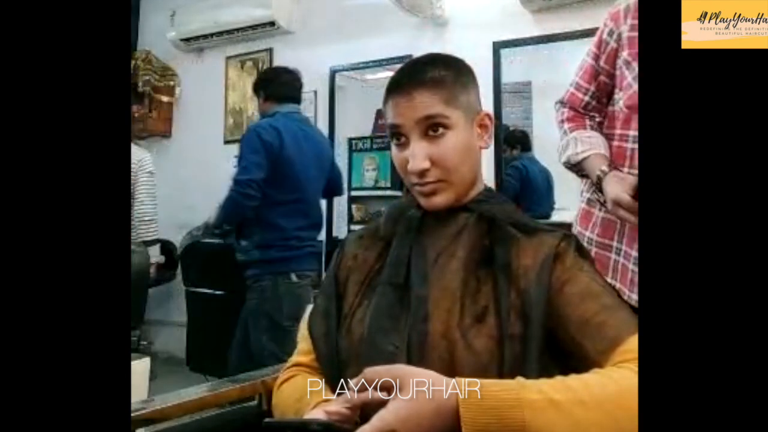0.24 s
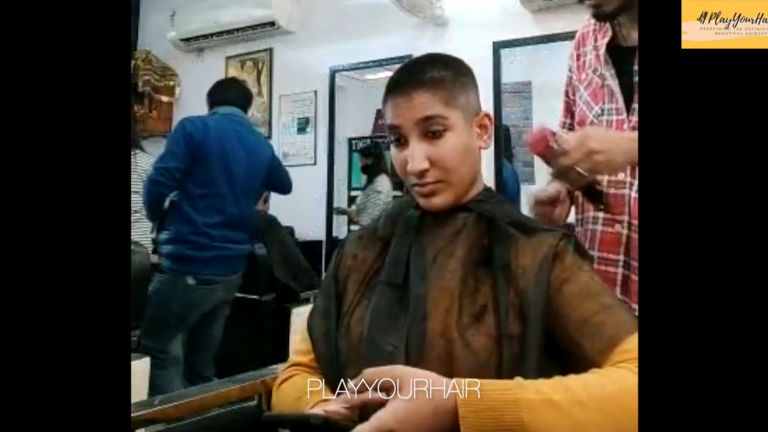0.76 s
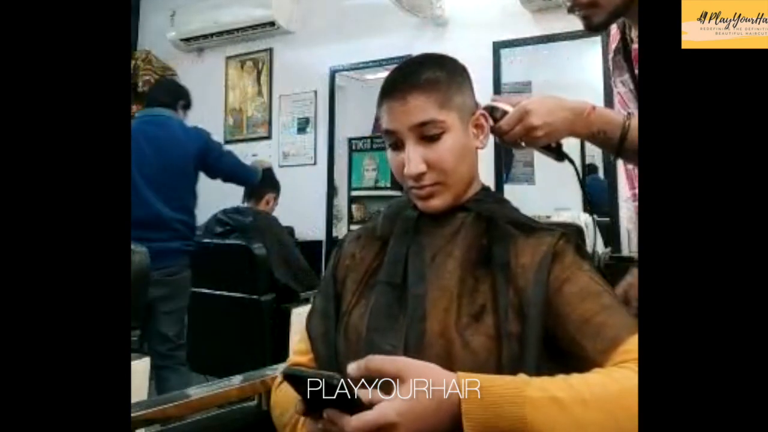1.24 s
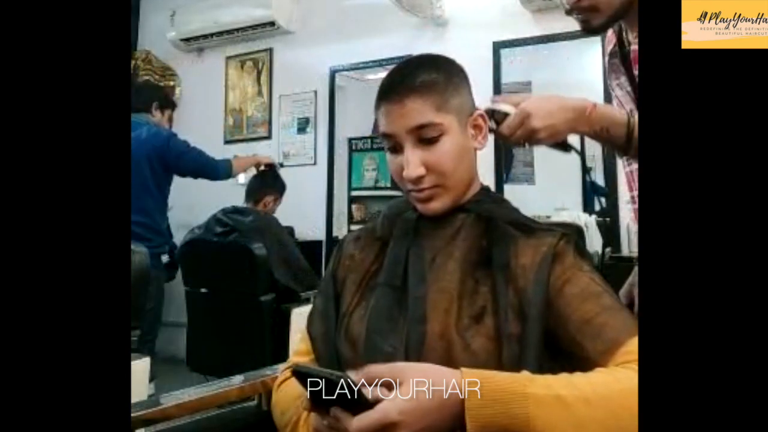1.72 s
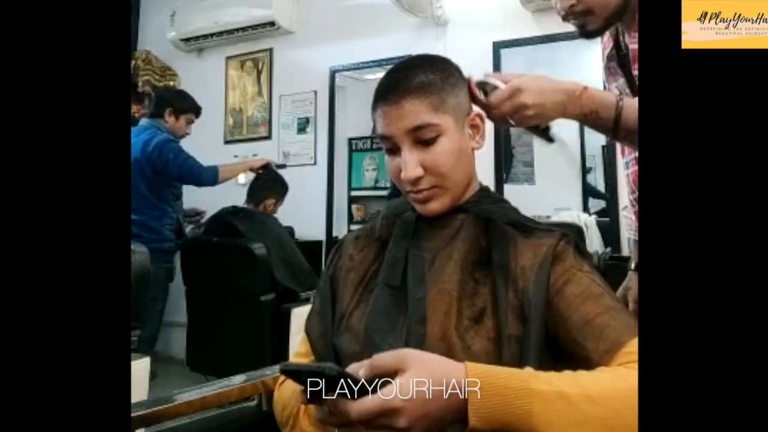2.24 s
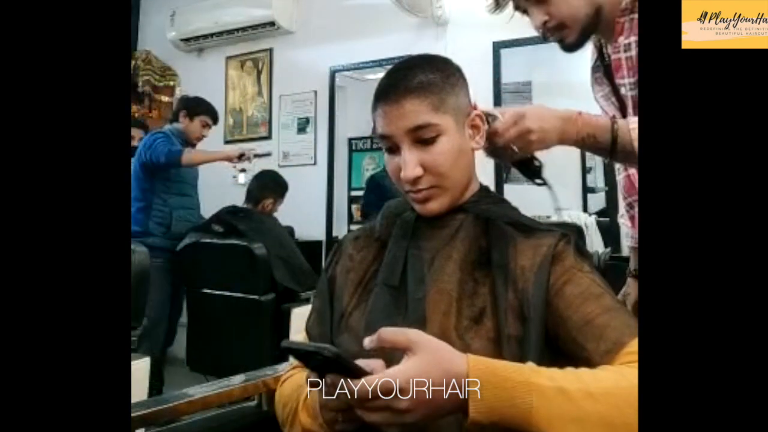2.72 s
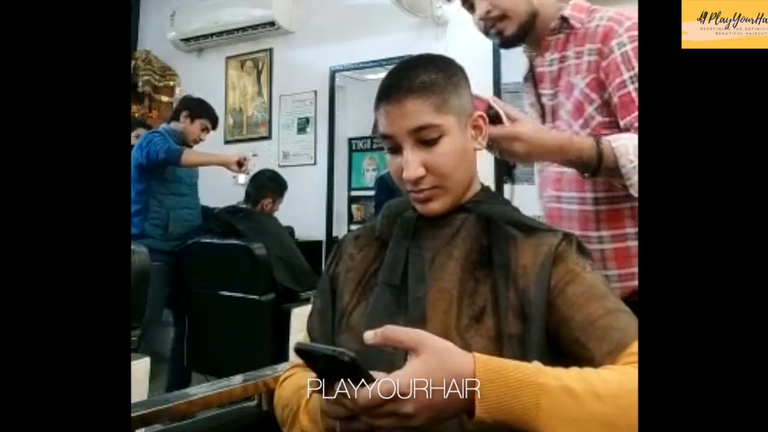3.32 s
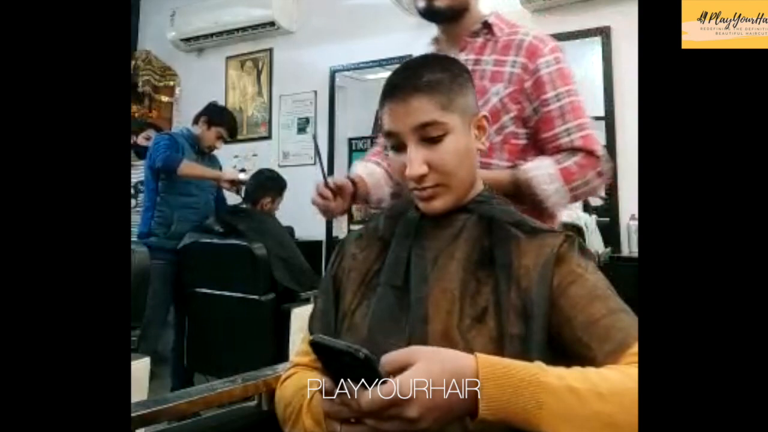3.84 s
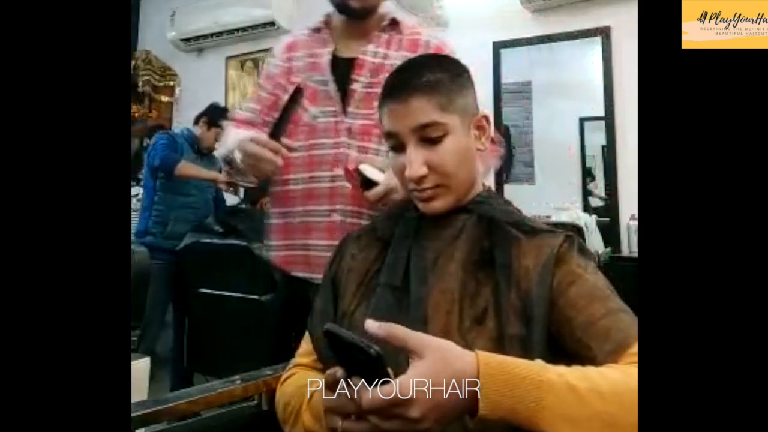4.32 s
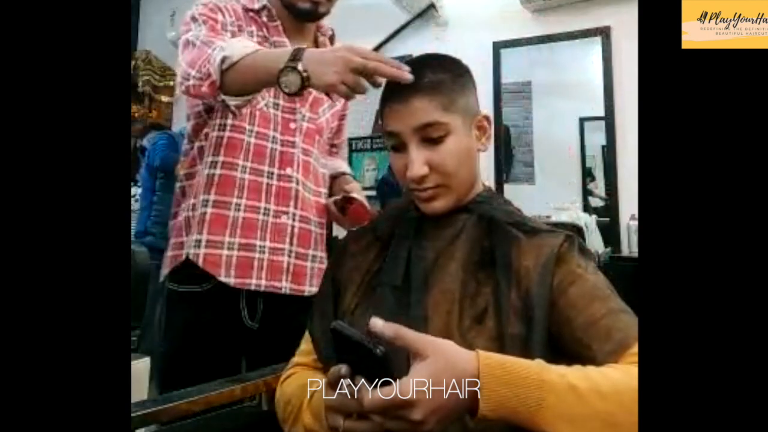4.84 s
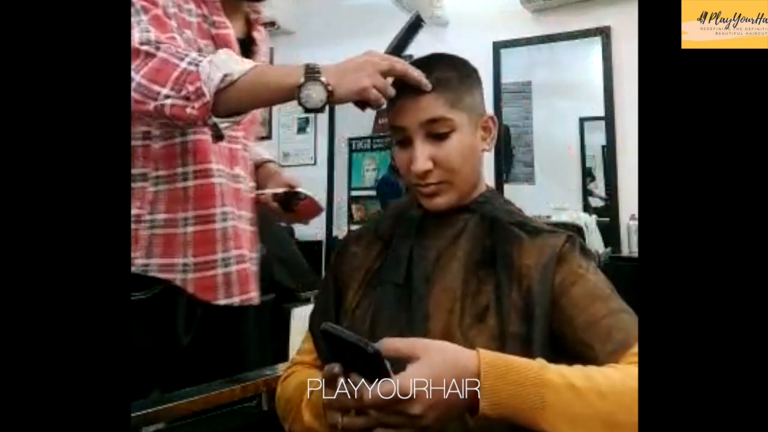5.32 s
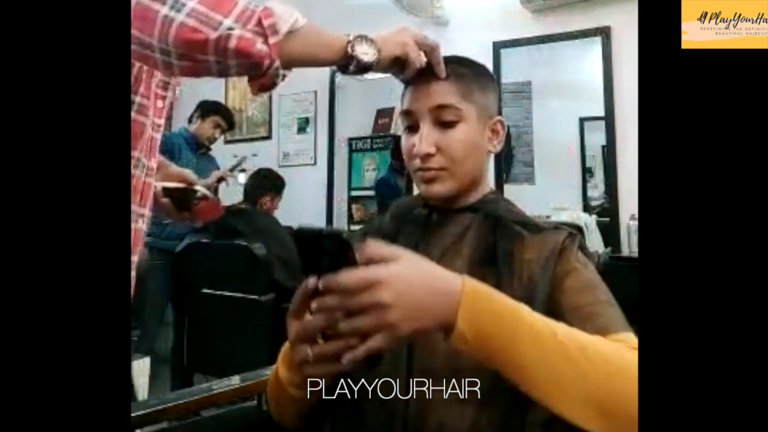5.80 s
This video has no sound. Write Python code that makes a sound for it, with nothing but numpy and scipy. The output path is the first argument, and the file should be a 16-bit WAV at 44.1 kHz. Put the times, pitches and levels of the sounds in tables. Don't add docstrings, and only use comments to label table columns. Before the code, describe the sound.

A corded hair clipper runs without a break, already on at the start. Its hard, nasal metallic buzz has little bass and a bright sizzle of sliding blades. It swells and relaxes about four times a second, and its tone shifts slightly near two seconds and again near the end. It slowly moves away from a phone microphone, a little to the left, in a small dry salon.

```python
import sys
import numpy as np
from scipy import signal
from scipy.fft import rfft, irfft, next_fast_len
from scipy.io import wavfile
from scipy.ndimage import uniform_filter1d, map_coordinates

SR = 44100
rng = np.random.default_rng(int(sys.argv[2]) if len(sys.argv) > 2 else 0)


def unload_audio(sound):
    columns = np.transpose(np.atleast_2d(sound))
    steps = np.round(np.clip(columns, -1, 1) * 32767)
    wavfile.write(sys.argv[1], SR, steps.astype(np.int16))


def gain_from_db(level_db):
    decades = np.asarray(level_db, float) / 20
    return 10 ** decades


N = 267686

TURN_HZ = 97.455
LEAD_TURNS = 5
MIC_HIGHPASS_HZ, ROOM_HIGHPASS_HZ, EDGE_HZ = 880, 700, 13170
SLAP_LOOSE_DB, SLAP_TIGHT_DB = -23, -7.5
SHAKE_LOOSE_DB, SHAKE_TIGHT_DB = -42.5, -24
PLAY_GAIN = 1.08
PLAY_ROUND = 0.5
HUM_LEAD_RAD = 0.13
FLECK_PEAK_S, FLECK_SPREAD_S = 2.2, 2.3

# t/s, level/dB
DISTANCE_DB = [(0.0, -26), (0.15, -27), (0.32, -25.5), (0.44, -27.5), (2.06, -27.5), (2.2, -29),
               (3.03, -29), (3.96, -30.5), (4.09, -28.5), (4.18, -30), (5.29, -32), (5.61, -34),
               (5.82, -33), (5.93, -34.5), (6.07, -33.5)]
# tightest t/s, creep/s, release/s, tightness/0-1
SEIZES = [(0.0, .1, 0.22, 0.78), (.32, 0.21, 0.3, 0.71), (.57, 0.11, .1, 0.9), (.71, .05, 0.052, 0.63),
          (.83, 0.086, 0.1, 0.63), (1.04, 0.11, 0.13, 0.8), (1.27, 0.13, 0.12, 0.92),
          (1.52, 0.22, .14, 0.94), (1.82, 0.15, 0.1, 0.8), (2.04, 0.061, .2, 0.6), (2.21, 0.33, 0.06, 0.86),
          (2.46, 0.1, 0.11, 0.8), (2.74, 0.13, 0.085, 0.88), (3.02, 0.15, 0.13, 0.84),
          (3.30, 0.2, 0.14, 0.85), (3.58, 0.18, 0.18, 0.82), (3.83, 0.21, 0.16, .85), (4.09, 0.18, .15, .6),
          (4.37, 0.19, 0.11, 0.77), (4.67, .16, 0.13, 0.81), (4.95, 0.18, .18, 0.75),
          (5.23, 0.26, 0.066, 0.8), (5.46, 0.19, 0.33, 0.6), (5.78, 0.29, 0.25, 0.7)]
# f/Hz, t60/ms, moment/turn, loose level/dB, tight level/dB
SHELL_MODES = [(1082, 8.7, 0.155, -17.1, -14.3), (1136, 27.3, 0.971, -6.2, -13.2),
               (1297, 15.6, 0.57, -7.2, -8.8), (1407, 35.1, 0.791, -1.0, -0.0),
               (1813, 31.2, 0.243, -2.2, -2.5), (1915, 9.4, 0.931, -15.3, -18.8),
               (2326, 3.8, 0.363, -22.5, -25.1)]
# f/Hz, t60/ms, moment/turn, loose level/dB, tight level/dB
BLADE_MODES = [(2794, 9.9, 0.99, -8.8, -10.8), (2875, 3.3, 0.526, -14.7, -12.9),
               (2931, 17.0, 0.913, -5.2, -10.0), (2967, 7.9, 0.849, -60.0, -9.2),
               (3062, 26.6, 0.039, -0.0, -0.0), (3288, 40.0, 0.477, -4.0, -7.0),
               (3757, 36.6, 0.085, -3.4, -4.6), (3921, 2.0, 0.387, -15.8, -16.6),
               (3931, 7.9, 0.351, -7.7, -10.3), (4725, 29.6, 0.717, -13.6, -6.2)]
# f/Hz, t60/ms, moment/turn, loose level/dB, tight level/dB
TEETH_MODES = [(5368, 10.3, 0.541, -13.9, -25.1), (5376, 3.4, 0.502, -32.9, -16.0),
               (5998, 12.0, 0.255, -14.5, -10.5), (6088, 3.6, 0.863, -17.5, -17.7),
               (6190, 9.1, 0.795, -16.0, -33.3), (6627, 4.1, 0.375, -22.0, -22.3),
               (7373, 6.1, 0.189, -28.6, -25.7), (8617, 15.0, 0.293, -30.4, -27.1),
               (9121, 14.5, 0.143, -24.1, -22.5), (9862, 3.5, 0.944, -25.9, -29.0),
               (11274, 14.5, 0.485, -23.4, -24.7)]
# f/Hz, t60/ms, moment/turn, loose level/dB, tight level/dB
LOOSE_TICK = (11200, 2.8, .478, -17, -25)
# t/s, length/s, centre f/Hz, width/Hz, gain/dB
GRIPS = [
    (0.026, 0.054, 1190, 120, 6.5),
    (0.324, 0.08, 1225, 120, 6),
    (1.25, 0.14, 1120, 100, -0.5),
    (2.072, 0.13, 3630, 435, -12),
    (2.085, .15, 8260, 1490, 7),
    (2.08, 0.18, 2200, 302, 9.5),
    (5.758, 0.11, 1220, 120, 7.5),
]
# f/Hz, t60/ms, moment/turn, level over the slap/dB
SLAP_MODES = [(12350, 3.6, .51, -4.5), (13160, 5.5, 0.69, -25), (12950, 3, .535, -14)]
# multiple of the turn, level at full shake/dB, share of the shake followed
HUM_ORDERS = [(1, -45, 0.56), (2, -33.5, 0.67), (3, -23, 1), (4, -28, 0.88), (5, -39, 0.078), (6, -31, 0.4),
              (7, -35.5, 0.39), (8, -34, 0.017)]
# f/Hz, density/dB per Hz
HISS_DB = [(30, -45), (170, -28), (290, -29), (720, -24), (1260, -2), (1640, -11.5), (1890, -7), (2280, -7),
           (2900, -1), (3500, -7), (6100, -5), (7900, -15.5), (10500, -16), (12500, -9), (15000, -16.5)]
# moment/turn, width/turn, level over steady hiss/dB
REVERSALS = [(.46, 0.02, 2), (.59, 0.019, -6), (.945, .017, 2)]
# f/Hz, share/0-1
FRESH_SHARE = [(100, 0.94), (1000, 0.76), (3000, 0.66), (6000, 0.64), (12000, 1)]
# f/Hz, share/0-1
APART_SHARE = [(100, 0.07), (300, 0.021), (700, 0.04), (2500, 0.05), (6000, 0.015), (12000, 0.23)]
# f/Hz, level/dB
TILT_DB = [(60, 0.0), (240, 0.4), (940, 2.3), (3740, 2.6), (8000, 1.5), (14800, 2.3)]
# f/Hz, width/Hz, gain/dB
DIPS = [(877, 11, -3.5), (2290, 104, -6), (3430, 40, -3), (2730, 20, -0.5), (4490, 50, -4.5)]
# f/Hz, t60/s
ROOM_T60_S = [(300, 0.06), (2000, 0.23), (12000, 0.18)]


def motor(wobble_hz=0.0914):
    return np.cumsum(TURN_HZ + wobble_hz * drift(count=N, size=1200)) / SR


def turn_times(turns, moment=0):
    marks = np.arange(-LEAD_TURNS, int(turns[-1]) + 1) + moment
    known_turns = np.r_[-LEAD_TURNS, turns, turns[-1] + 2]
    known_samples = np.r_[-LEAD_TURNS * SR / TURN_HZ, np.arange(N), N + 2 * SR / TURN_HZ]
    return np.interp(marks, known_turns, known_samples)


def tightness(loose=0, tight=1):
    t = np.arange(0, N / SR, 0.002)
    grip = np.zeros(len(t))
    for peak_s, creep_s, release_s, size in SEIZES:
        away = np.where(t < peak_s, (peak_s - t) / creep_s, (t - peak_s) / release_s)
        bump = np.cos(np.pi / 2 * np.clip(away, 0, 1)) ** (2 * PLAY_ROUND)
        grip = np.maximum(grip, size * bump)
    grip = uniform_filter1d(grip, size=10)
    return loose + (tight - loose) * np.interp(np.arange(N) / SR, t, grip)


def knocks(turns):
    at = turn_times(turns)
    t = at / SR
    tight = np.clip(np.interp(at, np.arange(N), PLAY_GAIN * tightness()), 0, 1.1)
    out = np.zeros(N)
    for modes in (SHELL_MODES, BLADE_MODES, TEETH_MODES, [LOOSE_TICK]):
        for hz, t60_ms, moment, loose_db, tight_db in modes:
            force = (1 - tight) * gain_from_db(loose_db) + tight * gain_from_db(tight_db)
            for grip_s, length_s, grip_hz, width_hz, db in GRIPS:
                nearness = np.exp(-((t - grip_s) / length_s) ** 4 - ((hz - grip_hz) / width_hz) ** 2)
                force = force * gain_from_db(db * nearness)
            out += ring(turns, hz, t60_ms, moment, force)
    return filtered(out, 4, MIC_HIGHPASS_HZ, "high")


def ring(turns, hz, t60_ms, moment, force, wander=0.12, rattle=0.0047):
    lead, count = int(LEAD_TURNS * SR / TURN_HZ) + 1, len(force)
    at = turn_times(turns, moment) + lead
    whole = np.ceil(at).astype(int)
    slow = drift(count=count, size=5) + 1j * drift(count=count, size=5)
    quick = rng.standard_normal(count) + 1j * rng.standard_normal(count)
    rattle_size = rattle * hz / 1000 * min(1, 4 / t60_ms) ** 2
    decay = np.exp(-np.log(1000) * 1000 / t60_ms / SR)
    step = 2j * np.pi * hz / SR
    blows = np.zeros(whole[-1] + SR // 10, complex)
    blows[whole] = force * (1 + wander * slow + rattle_size * quick)
    blows[whole] *= np.exp(step * (whole - at)) * SR / TURN_HZ
    pole = decay * np.exp(step)
    rung = signal.lfilter([(1 - decay) ** 2], [1, -2 * pole, pole ** 2], blows)
    return rung.real[lead:lead + N]


def slap(turns, idle_db=-19):
    slap_db = np.interp(turn_times(turns), np.arange(N), tightness(SLAP_LOOSE_DB, SLAP_TIGHT_DB))
    force = np.sqrt(np.maximum(gain_from_db(2 * slap_db) - gain_from_db(2 * idle_db), 0))
    return sum(ring(turns, hz, t60_ms, moment, force * gain_from_db(db)) for hz, t60_ms, moment, db in SLAP_MODES)


def hum(turns, wander=0.26, full_db=-25):
    out = np.zeros(N)
    shake_db = tightness(SHAKE_LOOSE_DB, SHAKE_TIGHT_DB) - full_db
    for order, db, share in HUM_ORDERS:
        size = gain_from_db(db + share * shake_db) * (1 + wander * drift(count=N, size=1200))
        out = out + size * np.exp(2j * np.pi * (round(order) * turns + rng.random()))
    return out


def hiss(turns, level_db=-5.5, shake_share=0.35):
    swell = np.zeros(N)
    for moment, width, db in REVERSALS:
        from_reversal = (turns - moment + 0.5) % 1 - 0.5
        swell += gain_from_db(db) * np.exp(-0.5 * (from_reversal / width) ** 2)

    def fresh_share(hz):
        return np.clip(read(FRESH_SHARE, hz), 0.01, 0.99)

    fresh, other = rng.standard_normal((2, N))
    white = colour(fresh, lambda hz: 20 * np.log10(fresh_share(hz)))
    white += colour(scrape(turns), lambda hz: 10 * np.log10(1 - fresh_share(hz) ** 2))
    apart = colour(other, lambda hz: 20 * np.log10(np.clip(read(APART_SHARE, hz), 0.01, 1)))
    noise = colour(white + np.outer([1, -1], apart), lambda hz: read(HISS_DB, hz))
    treble = filtered(noise, 2, 3500, "high")
    bass = filtered(noise, 2, 450, "low")
    shake = gain_from_db(shake_share * (tightness(SHAKE_LOOSE_DB, SHAKE_TIGHT_DB) + 31.5)) - 1
    return gain_from_db(level_db) * evened(noise + swell * treble + shake * bass)


def scrape(turns, size=1024):
    count = int(turns[-1]) + 2
    orders = rng.standard_normal((count, 156)) + 1j * rng.standard_normal((count, 156))
    pattern = irfft(orders, size)
    for _ in range(2):
        pattern = uniform_filter1d(pattern, size=6, axis=0)
    return evened(map_coordinates(pattern, [turns, turns % 1 * (size - 1)], order=1))


def heard(hz):
    dips = sum(db * np.exp(-((hz - f) / width_hz) ** 2) for f, width_hz, db in DIPS)
    return dips + np.outer([0.5, -0.5], read(TILT_DB, hz))


def room(x):
    taps = np.zeros((2, SR // 2))
    at = np.arange(300, SR // 2 - 20, 20)
    at = at + rng.integers(0, 20, (2, len(at)))
    np.put_along_axis(taps, at, rng.choice([-1., 1.], at.shape), 1)
    hz, t, z = signal.stft(taps, SR, nperseg=256)
    tail = signal.istft(z * gain_from_db(-60 * t / read(ROOM_T60_S, hz)[:, None]), SR, nperseg=256)[1]
    thin = filtered(x, 4, ROOM_HIGHPASS_HZ, "high")
    return signal.fftconvolve(thin[None], tail / np.linalg.norm(tail[0]), axes=1)[:, :N]


def evened(x):
    return x / np.sqrt(np.mean(abs(x) ** 2) + 1e-20)


def drift(count, size):
    return evened(uniform_filter1d(uniform_filter1d(rng.standard_normal(count), size), size))


def read(points, hz):
    f, value = np.transpose(points)
    return np.interp(np.log(hz + 1), np.log(f + 1), value)


def curve(rows):
    t, value = np.transpose(rows)
    return np.interp(np.arange(N) / SR, t, value)


def colour(x, db_of):
    size = next_fast_len(N + SR // 10, True)
    return irfft(rfft(x, size) * gain_from_db(db_of(np.fft.rfftfreq(size, 1 / SR))), size)[..., :N]


def filtered(x, order, hz, kind):
    return signal.sosfilt(signal.butter(order, hz, kind, fs=SR, output="sos"), x)


def scene():
    turns = motor()
    ports = np.exp([1j * HUM_LEAD_RAD, -1j * HUM_LEAD_RAD])
    shell = np.outer(ports, hum(turns)).real
    clipper = gain_from_db(curve(DISTANCE_DB)) * (knocks(turns) + slap(turns) + shell + hiss(turns))
    near = colour(clipper, heard)
    return near + gain_from_db(-15.5) * room(near.mean(0))


def top_cut(x):
    return signal.sosfilt(signal.butter(12, 15420, fs=SR, output="sos"), x)


def record(dry):
    lowpass = signal.firwin(511, EDGE_HZ, window=("kaiser", 10), fs=SR)
    low = signal.oaconvolve(dry, lowpass[None], "same")
    hz, t, z = signal.stft(dry - low, SR, nperseg=512)
    slap_db = np.interp(t, np.arange(N) / SR, tightness(SLAP_LOOSE_DB, SLAP_TIGHT_DB))
    weak = -(slap_db + 17) / 6 - ((t - FLECK_PEAK_S) / FLECK_SPREAD_S) ** 2 / 2
    flecks = uniform_filter1d(rng.standard_normal(z.shape[1:]), size=6, axis=0)
    flecks = uniform_filter1d(flecks, size=9, axis=1)
    band = (hz[:, None] > 13400) & (hz[:, None] < 14950)
    passed = band & (evened(flecks) + weak > 1.05)
    top = signal.istft(z * passed, SR, nperseg=512)[1][:, :N]
    return top_cut(low + top)


dry = scene()
out = record(dry)
unload_audio(out)
```